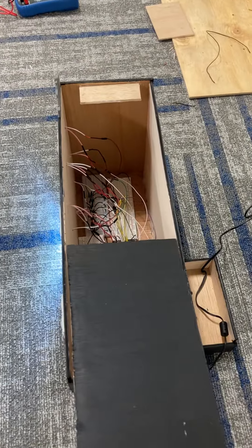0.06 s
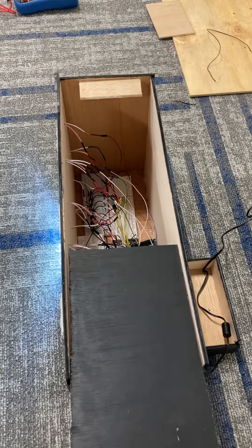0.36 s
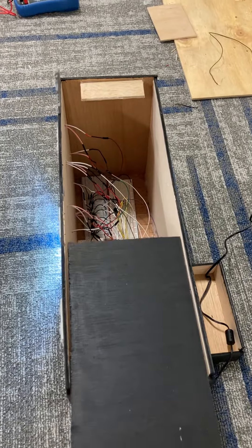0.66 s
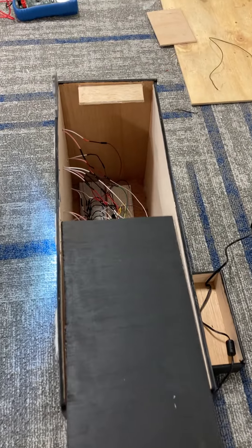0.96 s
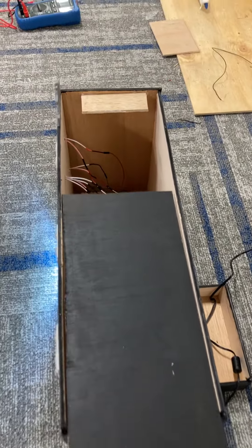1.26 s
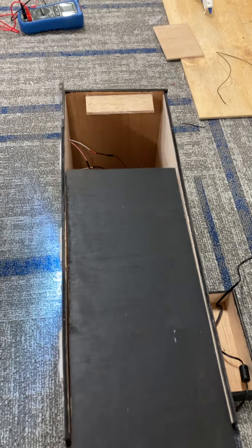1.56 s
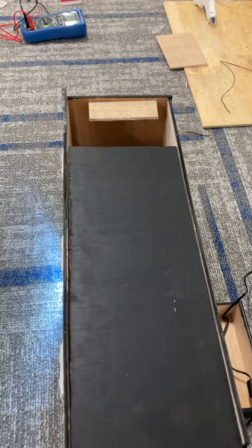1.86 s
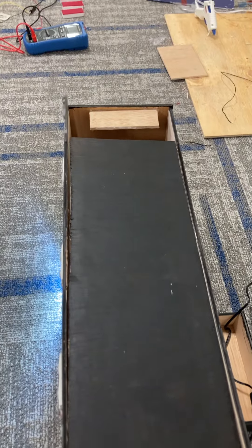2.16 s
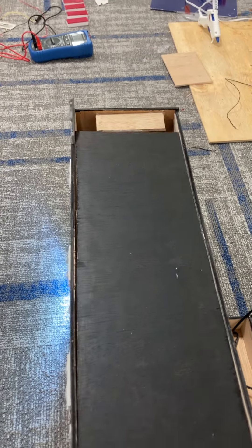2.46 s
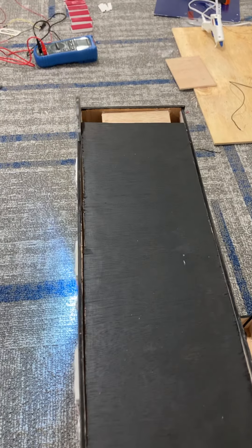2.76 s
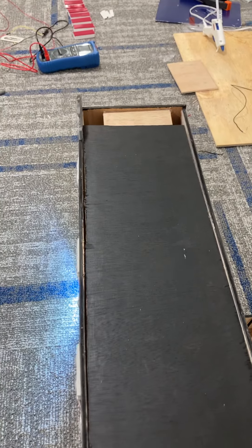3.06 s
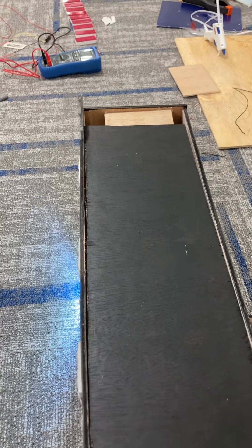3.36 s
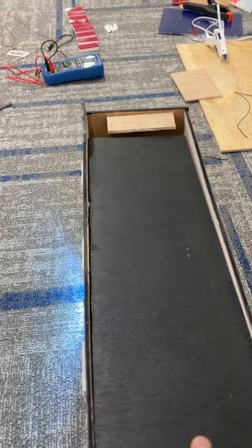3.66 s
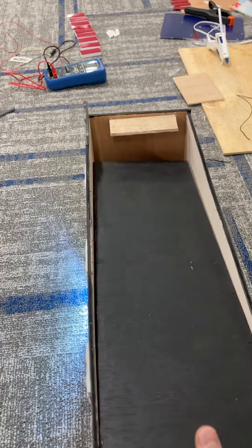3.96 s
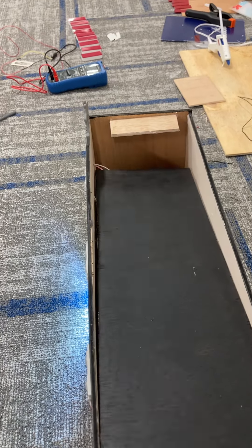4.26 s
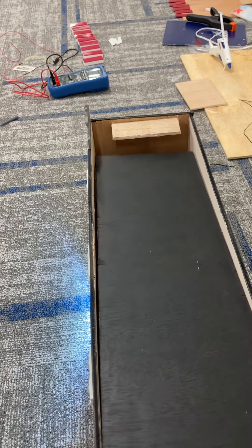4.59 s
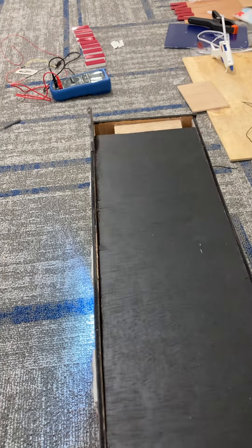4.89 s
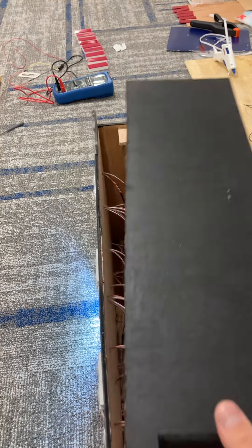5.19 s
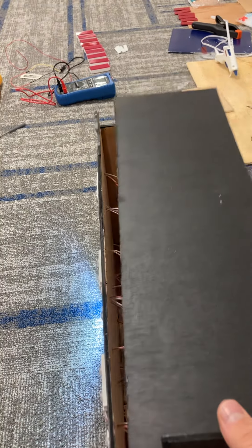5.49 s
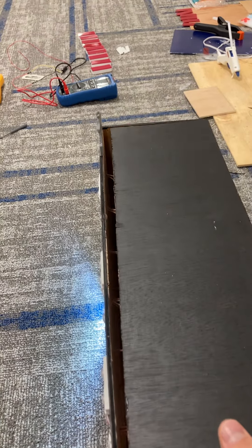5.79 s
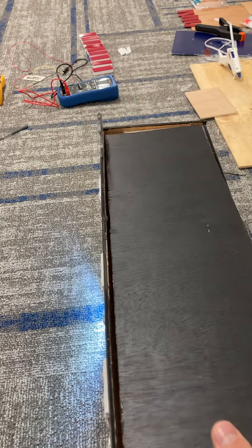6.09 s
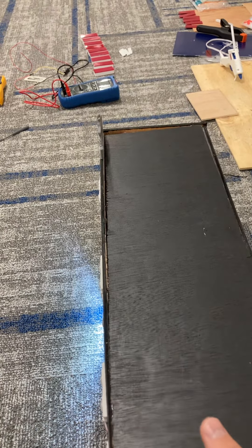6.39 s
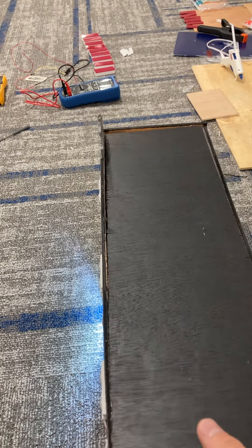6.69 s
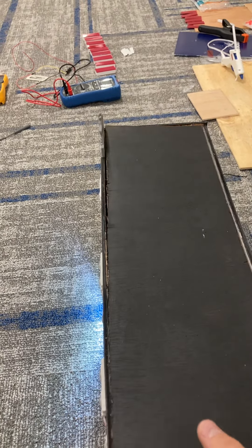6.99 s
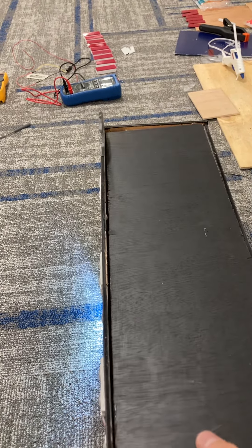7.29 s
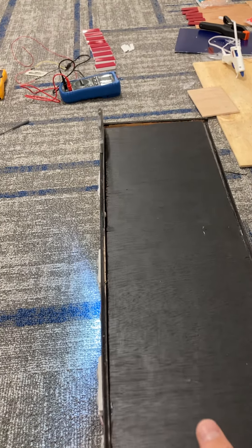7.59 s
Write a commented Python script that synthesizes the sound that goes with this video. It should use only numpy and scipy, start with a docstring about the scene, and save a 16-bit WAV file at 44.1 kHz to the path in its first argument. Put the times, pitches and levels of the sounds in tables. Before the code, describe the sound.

A wooden lid scrapes along the rim of a box, then knocks, shuffles and taps into place over a low ventilation hum.

```python
"""Carpeted room: a painted plywood lid is slid along the rim of a wooden box, lifted, set down and
nudged into place. Stick-slip grains and knocks ring the same panel and board modes; the rails ring
and squeak, the paint hisses and snaps, edges tick. Ventilation hums underneath.
A hand-held phone with two microphones listens from above."""
import sys
import numpy as np
from scipy import signal
from scipy.fft import rfft, irfft
from scipy.io import wavfile
from scipy.ndimage import uniform_filter1d

SR = 44100
rng = np.random.default_rng(int(sys.argv[2]) if len(sys.argv) > 2 else 0)


def waveform_to_disk(signal):
    """Save audio, clipped to [-1, 1], as 16-bit WAV at the path in sys.argv[1]."""
    frames = np.transpose(np.atleast_2d(signal))
    scaled = np.clip(frames, -1, 1) * 32767
    samples = np.round(scaled).astype(np.int16)
    wavfile.write(sys.argv[1], SR, samples)


N = 345744
TIME_S = np.arange(N) / SR
RING_S = TIME_S[:SR // 4]

# long push along the rim: (time [s], friction [dB], brightness [dB])
SLIDE = [(.3, -47, -6), (.52, -51.5, -3.5), (.66, -39.5, -1.5), (.8, -37, 0.5), (1.06, -38.5, 1.5),
         (1.22, -38.5, 6.5), (1.35, -37, -2), (1.52, -38.5, -0.5), (1.68, -39, -3), (1.88, -40.5, -6),
         (2.06, -48.5, 4.5), (2.24, -47, -0.5), (2.42, -58, -1.5), (2.57, -51, 2), (2.72, -74, -17)]
# short shoves, bright on a bare edge, dull with the lid flat:
# (full-force time [s], swell [s], hold [s], stop t60 [s], friction [dB], brightness [dB])
SHOVES = [(.01, .015, 0.019, 0.22, -52.5, -2.5), (.165, 0.035, 0.017, .28, -57.5, 1),
          (.208, .02, 0.016, 0.37, -53, 4.5), (.361, 0.017, .047, 0.22, -50, 8.5),
          (3.0, 0.082, .04, 0.27, -45.5, 1), (3.1, .033, 0.11, 0.41, -57, -11),
          (3.175, 0.04, 0.02, 0.082, -56.5, 11.5), (3.538, 0.0062, 0.06, 0.22, -48.5, -1.5),
          (3.705, 0.18, 0.023, .17, -45.5, 7.5), (3.815, .028, 0.089, 0.16, -56, -4),
          (3.95, 0.016, 0.025, 0.23, -48.5, -5.5), (4.025, 0.03, 0.044, 0.26, -43, 8),
          (4.111, 0.023, 0.078, 0.21, -50, 2), (4.45, 0.27, .13, 0.16, -53.5, -2),
          (4.48, .13, 0.19, 0.16, -63.5, 24), (4.57, 0.022, .016, 0.32, -58, 29.5),
          (4.7, 0.022, .04, 0.19, -61.5, 18), (4.752, 0.049, 0.068, 0.3, -47.5, 8),
          (4.942, 0.16, 0.047, 0.2, -52, 4.5), (6.13, 0.12, 0.08, 0.17, -55.5, -1),
          (6.285, 0.037, .012, 0.13, -50, 3), (6.325, .03, 0.014, .2, -58, 6),
          (6.402, 0.043, .045, .15, -51.5, 12), (6.475, .03, 0.014, .25, -51.5, 3),
          (6.54, .03, 0.0092, .25, -63.5, 15), (6.712, .03, 0.0073, .16, -64.5, 9),
          (6.78, .015, 0.059, .15, -65.5, 11), (6.87, .04, .02, 0.18, -61.5, 10),
          (7.135, 0.11, 0.026, 0.38, -53.5, 5.5), (7.23, 0.067, 0.087, 0.3, -58, 6.5),
          (7.333, 0.016, 0.02, .15, -48.5, 4.5), (7.378, .02, .012, 0.067, -53, 9),
          (7.505, 0.21, 0.062, 0.12, -57, 4.5), (7.549, .012, 0.0048, 0.055, -57, 19),
          (7.625, 0.061, 0.022, 0.25, -52, 13), (7.788, 0.011, 0.024, 0.086, -65.5, 15)]
# lid striking or catching on the box:
# (time [s], thump [dB], clack [dB], tick [dB], panel focus [Hz], board focus [Hz], chatter decay [s])
KNOCKS = [(0.008, -33, -34.5, -66, 235, 1280, 0.0011), (0.159, -61, -47, -59.5, 300, 1780, 0.011),
          (0.2721, -23, -23.5, -44, 337, 734, 0.0032), (0.285, -23.5, -33, -51, 322, 760, 0.0055),
          (0.3176, -16, -26, -61, 310, 736, 0.0068), (0.361, -31.5, -53, -73, 345, 750, .004),
          (0.707, -25, -47, -59, 300, 764, 0.0056), (0.742, -23, -40, -64, 305, 760, .005),
          (0.828, -25, -33, -73, 263, 820, 0.013), (1.167, -18.5, -29, -53, 297, 1040, 0.0063),
          (1.698, -28, -35.5, -75, 287, 790, 0.019), (1.97, -25, -40, -59, 318, 940, 0.0053),
          (2.497, -61, -45.5, -66, 242, 734, 0.023), (2.583, -28, -42, -64.5, 272, 700, 0.02),
          (3.006, -18.5, -32, -75, 260, 1680, 0.0036), (3.037, -21, -38, -52.5, 260, 890, 0.0033),
          (3.065, -25.5, -48, -60, 216, 650, 0.0048), (3.08, -32, -32.5, -59, 231, 1650, 0.0034),
          (3.103, -28.5, -34.5, -63, 216, 1650, 0.0093), (3.119, -27, -57, -64, 198, 1680, .005),
          (3.533, -33, -39, -77, 194, 720, 0.01), (3.603, -37.5, -46, -69, 198, 736, 0.011),
          (3.735, -33.5, -43, -71, 240, 740, 0.0068), (3.789, -22.5, -22, -41.5, 245, 1730, 0.0029),
          (3.795, -26.5, -22.5, -47, 305, 574, 0.0027), (3.818, -33, -44, -50, 280, 594, 0.015),
          (3.946, -31.5, -43, -62, 270, 700, 0.0063), (4.019, -51, -43, -54, 282, 1650, 0.0025),
          (4.044, -29, -40, -45, 290, 1450, 0.012), (4.061, -23.5, -29.5, -47, 290, 620, 0.0038),
          (4.074, -18, -22.5, -37, 373, 512, 0.0062), (4.079, -37, -25.5, -37, 350, 1650, 0.0035),
          (4.089, -31, -38, -69, 362, 600, 0.0061), (4.162, -35, -38.5, -55.5, 300, 1300, 0.0065),
          (4.21, -26, -66, -86, 268, 730, 0.0045), (4.431, -32, -58, -73, 268, 760, 0.005),
          (4.741, -45, -49, -53, 245, 1650, 0.0071), (4.797, -36, -40.5, -80, 224, 715, 0.0085),
          (4.806, -40, -48, -52, 250, 1650, 0.0025), (4.935, -35, -52, -79, 266, 730, 0.0056),
          (4.997, -57, -42, -55, 270, 2040, 0.0062), (5.797, -35, -54, -75, 256, 730, .005),
          (5.868, -34, -40.5, -68, 212, 496, 0.0034), (5.88, -36, -48, -78, 224, 730, .005),
          (6.066, -37, -34, -69, 213, 1815, 0.0047), (6.076, -26.5, -41, -69, 220, 517, 0.0061),
          (6.093, -27.5, -35.5, -102, 255, 516, 0.0073), (6.109, -31, -63, -89, 220, 609.5, 0.0077),
          (6.389, -30.5, -55, -58, 297, 1060, 0.0048), (7.125, -34.5, -45.5, -51.5, 234, 1790, .006),
          (7.145, -31.5, -34, -62, 290, 1440, 0.0082), (7.156, -32, -41, -55, 230, 680, 0.0082),
          (7.191, -27.5, -39, -83, 213, 694, 0.0059), (7.336, -31.5, -54, -50.5, 216, 706, 0.0082),
          (7.393, -30.5, -50.5, -97, 195, 690, 0.0052)]
# slight shift in the wood's tone: (time [s], blend from mode levels A toward B [fraction])
TONE_BLEND = [(.3, 0.16), (.6, 0), (1.9, 0), (2.6, 0.13), (3.0, 0.12)]
# panel bending modes: (frequency [Hz], level A [dB], level B [dB], base t60 [s])
PANEL_MODES = [(122, 8.5, 15.5, 0.023), (145, -23, 7, 0.093), (164.4, -7.5, 20, 0.32), (195, -9, 6, 0.18),
               (221.9, -1, 0.5, 0.18), (245, 4, -20, 0.092), (267.7, 1.5, -10, 0.043),
               (289.2, 1, -8, 0.098), (306.5, -9, 4, 0.068), (343.9, 0, 5.5, 0.18), (373.3, -6, 0.5, 0.13)]
# higher board modes: (frequency [Hz], level A [dB], level B [dB], base t60 [s])
BOARD_MODES = [(428, -8, 22.5, 0.17), (500, -3, 22, 0.095), (539, -9.5, 12, 0.15), (604, 3, 9.5, 0.023),
               (647, 0, 16.5, 0.076), (738, 7, -27, 0.046), (812, 10.5, -27, 0.038),
               (962, -11.5, -33, 0.077), (1056, 9, -17.5, 0.027), (1223, -0.5, -17.5, 0.032),
               (1437, -11, -2, 0.033), (1650, 0.5, 15, 0.022), (1823, -5.5, 2, 0.02), (2137, -4, -4, 0.016),
               (2500, -4, -36, 0.019), (2887, -6.5, -12, 0.018), (3330, -7.5, -34, 0.017),
               (4010, -10.5, -59, 0.0046)]
# narrow rail modes: (frequency [Hz], level A [dB], level B [dB], t60 [s])
RAIL_MODES = [(927, 3.5, -6, 0.063), (1440, -6.5, -2, 0.052), (1657, 11, 1, 0.091), (2062, -7.5, 2, 0.04),
              (2314, -2.5, -6, 0.058), (2588, -1.5, -1, .08), (2829, -5, 5, 0.045), (2902, 1, 3, 0.027),
              (3420, -4.5, -7, 0.064), (3826, -4.5, -14, 0.03), (4010, -7.5, -8, 0.048)]
# whistling resonances of the painted edge: (frequency [Hz], width [Hz], level [dB])
SHEEN_MODES = [(7700, 190, -17), (8350, 130, 5), (9380, 160, 4), (9810, 170, 7)]
# box cavity after a square blow: (time [s], frequency [Hz], level [dB], t60 [s])
CAVITY_RINGS = [(.335, 336, -24, 0.44), (4.083, 352.8, -20, 0.34), (6.394, 317.7, -33, .4)]
# groans and squeaks on a rail: (time [s], length [s], frequency [Hz], level [dB])
SQUEAKS = [(0.598, 0.2, 273.2, -22.5), (1.275, 0.048, 752, -34), (1.72, 0.24, 844, -41),
           (1.93, 0.17, 351.2, -33), (3.643, 0.11, 1677, -50), (3.952, 0.071, 277, -33),
           (6.376, 0.11, 1027, -51), (6.385, 0.1, 650, -53)]
# tacky paint snapping free: (time [s], level [dB], t60 [s])
SNAPS = [(0.133, -91, 0.02), (0.274, -49, 0.034), (3.787, -35, 0.0044), (4.022, -46, 0.046),
         (4.078, -31.5, 0.012), (4.235, -64, .014), (4.822, -50.5, 0.022), (6.083, -63, .012),
         (6.285, -43, 0.022), (6.445, -37.5, 0.0033), (6.81, -53, 0.0049), (7.083, -59, 0.033),
         (7.139, -50, 0.019), (7.356, -39.5, 0.0087), (7.704, -58, 0.049)]
# wood contact noise: (frequency [Hz], level [dB])
WOOD_SPECTRUM = [(300, -23), (480, -2), (750, 5), (1050, -2.5), (1400, -7.5), (2000, -7), (2600, -19),
                 (3000, -25), (4200, -8.5), (6000, -10.5), (15000, -83)]
# rubbed paint: (frequency [Hz], level [dB])
PAINT_SPECTRUM = [(2500, 4), (4500, 0), (6300, 5), (8500, 9), (11000, 0), (14500, -0.5), (17000, -8.5)]
# edge tick: (frequency [Hz], level [dB])
TICK_SPECTRUM = [(1500, -26), (4000, -6), (6300, 0.5), (8500, 13.5), (11000, 5.5), (16000, -48)]
# paint snap: (frequency [Hz], level [dB])
SNAP_SPECTRUM = [(1000, -40), (3000, 7), (4500, 5), (6500, 10), (8500, 21), (11000, 17), (16000, 3)]
# ventilation rush: (frequency [Hz], level [dB])
AIR_SPECTRUM = [(20, -21), (45, -10), (65, 2), (90, -3.5), (125, -6.5), (170, -10), (300, -9), (370, -15.5),
                (440, -19.5), (750, -23), (1400, -29), (3000, -42.5), (6500, -50), (15000, -69)]
# fan tones: (frequency [Hz], level [dB])
FAN_TONES = [(64.6, -60), (123.8, -57), (360.7, -59.5)]
# microphone pair: (frequency [Hz], left phase lead [rad], left minus right [dB])
MIC_PAIR = [(60, 0, .2), (200, -.3, .8), (320, -.8, 3), (420, -1.15, -2.5), (600, -1.3, -5),
            (1000, -2.1, -3), (1350, -2, -3), (1680, -2.2, -1), (1950, -3.8, -1), (4100, -4.2, 0),
            (5600, -3.1, 0), (8500, 0, 0), (11700, 3.1, 0), (15000, 6.3, 0)]

SLIDE_RUMBLE_DB, SLIDE_HISS_DB, SHOVE_RUMBLE_DB, SHOVE_HISS_DB = 6, -13, 10, -11  # re rasp
RUMBLE_PER_BRIGHT, HISS_PER_BRIGHT = -0.59, 0.53  # dB per dB of brightness
SHOVE_SWELL_DB, JUDDER_HZ, JUDDER_DB = 22.5, 12, 3.5
REBOUND_S, REBOUND_SCATTER_S, REBOUND_DB, REBOUND_SOFTER_DB = 0.019, 0.00604, -11.5, 9.5
BOARD_DETUNE, BOARD_FOCUS_DB, BOARD_FOCUS_OCT = 0.011, 10.5, 0.13
CHATTER_PER_S, CHATTER_DB = 800, -4
RAILS_DB, RAILS_SAG_PER_S = -6.5, 0.06
ECHO_DELAY_S, ECHO_DB = (0.0008, 0.01), -4


def rubbing():
    """Rails drag on the lid: coarse slips rumble, finer ones rasp, the finest hiss."""
    rumble_gain, rasp_gain, hiss_gain = friction_gains()
    grip = walk(rate_hz=45)
    rumble, rasp, hiss = panel_rumble(), board_rasp(), paint_hiss()
    rasp, hiss = (unit(x + undb(ECHO_DB) * lid_echoes(x, rate_hz=7)) for x in (rasp, hiss))
    # the lid sticks and lurches
    judder_db = JUDDER_DB * np.sin(2 * np.pi * JUDDER_HZ * TIME_S + 3.18 * walk(rate_hz=8))
    return (rumble * rumble_gain * undb(judder_db + 1.5 * grip)
            + rasp * rasp_gain * undb(-3 + 0.76 * grip)
            + hiss * hiss_gain * undb(-0.8 + 1.3 * grip))


def friction_gains():
    """Rumble, rasp and hiss follow the push and shoves; an edge trades rumble for hiss."""
    times_s, push_db, bright_db = np.transpose(SLIDE)
    push = undb(np.interp(TIME_S, times_s, push_db)) * (TIME_S > times_s[0]) * (TIME_S < times_s[-1])
    bright_db = np.interp(TIME_S, times_s, bright_db)
    rumble = push * undb(SLIDE_RUMBLE_DB + RUMBLE_PER_BRIGHT * bright_db)
    hiss = push * undb(SLIDE_HISS_DB + HISS_PER_BRIGHT * bright_db)
    power = np.array([rumble, push, hiss]) ** 2
    for at_s, swell_s, hold_s, t60_s, db, bright_db in SHOVES:
        swell_db = -SHOVE_SWELL_DB * (at_s - TIME_S).clip(0, 1) / swell_s
        stop_db = -60 * (TIME_S - at_s - hold_s).clip(0, 1) / t60_s
        rumble_db = db + SHOVE_RUMBLE_DB + RUMBLE_PER_BRIGHT * bright_db
        hiss_db = db + SHOVE_HISS_DB + HISS_PER_BRIGHT * bright_db
        power += np.outer(undb([rumble_db, db, hiss_db]), undb(swell_db + stop_db)) ** 2
    return np.sqrt(power)


def panel_rumble():
    """Coarse slips shake the panel as the contact travels between knock spots."""
    times_s, _, _, _, panel_hz, _, _ = np.transpose(KNOCKS)
    rumble = dragged_modes(PANEL_MODES, slips(per_s=900, spread_db=1.16), wander_db=3.5, rate_hz=7,
                           focus_hz=np.interp(TIME_S, times_s, panel_hz), db_per_oct2=25.5)
    swing = np.sqrt(uniform_filter1d(rumble ** 2, size=900).clip(1e-9))
    return unit(rumble / swing ** 0.66)  # friction caps the swing


def board_rasp():
    """Fine slips and catching splinters ring the boards; pitch drifts with their free length."""
    catches = slips(per_s=3000, spread_db=0.5) + undb(9.5) * slips(per_s=70, spread_db=1)
    boards = dragged_modes(BOARD_MODES, catches, wander_db=1, rate_hz=11, focus_hz=910, db_per_oct2=-1)
    boards = drift(boards, share=0.018, rate_hz=7)
    grit = unit(colour(slips(per_s=1500, spread_db=4), WOOD_SPECTRUM))
    return unit(boards + undb(-3.5) * grit)


def paint_hiss():
    """The finest slips hiss on the paint and ring its edge."""
    fine = slips(per_s=4500, spread_db=2)
    sheen = sum(undb(db) * unit(resonance(fine, hz, width_hz)) for hz, width_hz, db in SHEEN_MODES)
    sheen = drift(sheen, share=0.0046, rate_hz=4)
    return unit(colour(fine, PAINT_SPECTRUM)) + undb(-7.5) * unit(sheen)


def slips(per_s, spread_db):
    """Friction releases: random impulses of unequal size."""
    impulses = (rng.random(N) < per_s / SR) * rng.choice([-1, 1], N)
    return impulses * undb(spread_db * rng.exponential(size=N).clip(0, 4))


def dragged_modes(modes, drive, wander_db, rate_hz, focus_hz, db_per_oct2):
    """Slip-driven modes swell and fade as the contact crosses nodes; total power is steady."""
    out, power, blend = 0, 0, blend_at(TIME_S)
    for hz, a_db, b_db, t60_s in modes:
        focus_db = -db_per_oct2 * np.log2(hz / focus_hz) ** 2
        gain = undb(a_db + blend * (b_db - a_db) + wander_db * walk(rate_hz) + focus_db)
        ring = resonance(drive, hz, width_hz=np.log(1000) / (np.pi * t60_s))
        ring = resonance(ring, hz, width_hz=hz / 1.93)  # little radiation far from the mode
        out += gain * unit(ring) * rng.choice([-1, 1])
        power += gain ** 2
    return out / np.sqrt(power)


def knocking():
    """The edge scuffs the rim, catches, and rebounds once, more softly."""
    out, lead_s = np.zeros(N), RING_S[:SR // 80]
    for at_s, thump_db, clack_db, tick_db, *contact in KNOCKS:
        blend = blend_at(at_s)
        hard_db = 6.5 + 0.77 * (tick_db - clack_db) + 0.049 * clack_db
        add(out, at_s, knock(blend, thump_db, clack_db, tick_db, hard_db, *contact))
        rebound = knock(blend, thump_db, clack_db, tick_db - REBOUND_SOFTER_DB,
                        hard_db - REBOUND_SOFTER_DB, *contact)
        rebound_s = at_s + REBOUND_S + REBOUND_SCATTER_S * rng.uniform(-1.017, 1)
        add(out, rebound_s, undb(REBOUND_DB) * rebound)
        scuff = crest(burst(np.exp(lead_s / 0.0021), PAINT_SPECTRUM))
        add(out, at_s - lead_s[-1], undb(tick_db - 6) * scuff)
    return out


def knock(blend, thump_db, clack_db, tick_db, hard_db, panel_hz, board_hz, chatter_s):
    """One blow: the edge ticks, the boards clack, the panel swells last."""
    thump = panel_thump(blend, panel_hz)
    clack = board_clack(blend, hard_db, board_hz, chatter_s)
    contact = fade(t60_s=0.0031, rise_s=0.00022) + undb(-5.5) * fade(t60_s=0.035, rise_s=0.0035)
    tick = crest(burst(contact, TICK_SPECTRUM))
    return undb(thump_db + 1) * thump + undb(clack_db - 0.73) * clack + undb(tick_db + 0.5) * tick


def panel_thump(blend, focus_hz):
    """Bending waves align 8 ms after contact, then drift apart."""
    hz, a_db, b_db, t60_s = np.transpose(PANEL_MODES)
    focus_db = -np.minimum(40 * np.log2(hz / focus_hz) ** 2, 9)
    gains = undb(a_db + blend * (b_db - a_db) + focus_db)
    waves = sum(gain * fade(decay_s, rise_s=0.00051) * np.cos(2 * np.pi * f * (RING_S - 0.008))
                for f, gain, decay_s in zip(hz, gains, 1.5 * t60_s))
    onset = 1 - np.exp(-(RING_S / 0.0008) ** 2)
    return crest(waves * onset)


def board_clack(blend, hard_db, focus_hz, chatter_s):
    """Each spot detunes the boards and favours one pitch; harder contact is brighter."""
    hz, a_db, b_db, t60_s = np.transpose(BOARD_MODES)
    focus_db = BOARD_FOCUS_DB * np.exp(-(np.log2(hz / focus_hz) / BOARD_FOCUS_OCT) ** 2)
    tilt_db = 0.36 * (hard_db + 16) * np.log2(hz / 1000)
    gains = undb(a_db + blend * (b_db - a_db) + focus_db + tilt_db)
    hz = hz * (1 + BOARD_DETUNE * rng.standard_normal(len(hz)))
    boards = crest(sum(gain * mode(f, decay_s, rise_s=2.6 / f)
                       for f, gain, decay_s in zip(hz, gains, 0.5 * t60_s)))
    crack = crest(burst(fade(t60_s=0.034, rise_s=0.00025), WOOD_SPECTRUM))
    crack_db = -5.5 + 0.47 * (hard_db - 5)
    return crest(convolve(boards + undb(crack_db) * crack, chatter(chatter_s)))


def chatter(decay_s):
    """Rough edge: one touch, then a dying run of small contacts."""
    touches = (rng.random(len(RING_S)) < CHATTER_PER_S / SR) * rng.standard_normal(len(RING_S))
    return (RING_S == 0) + undb(CHATTER_DB) * touches * np.exp(-RING_S / decay_s)


def box_cavity():
    """One low box mode rings on after a square blow."""
    out = np.zeros(N)
    for at_s, hz, db, t60_s in CAVITY_RINGS:
        add(out, at_s, undb(db) * mode(hz, t60_s, rise_s=0.0036))
    return out


def squeaking():
    """Slips lock briefly onto one wood mode."""
    out = np.zeros(N)
    for at_s, length_s, hz, db in SQUEAKS:
        count = int(length_s * SR)
        pitch_hz = hz * (1 + 0.027 * walk(rate_hz=hz / 8)[:count])
        envelope = (1 + 0.57 * walk(rate_hz=hz / 7)[:count]) * signal.windows.tukey(count, 0.7)
        add(out, at_s, undb(db) * envelope * np.sin(2 * np.pi * np.cumsum(pitch_hz) / SR))
    return out


def singing_rails():
    """The long push rings the rails; pitch sinks as more of the lid bears on them."""
    times_s, push_db, _ = np.transpose(SLIDE)
    start_s, end_s = times_s[0], times_s[-1]
    rails = dragged_modes(RAIL_MODES, slips(per_s=2500, spread_db=1), wander_db=6, rate_hz=8.95,
                          focus_hz=2500, db_per_oct2=-1.5)
    sag = RAILS_SAG_PER_S * (TIME_S.clip(start_s, end_s) - times_s.mean())
    rails = varispeed(rails, 1 - sag + 0.01 * walk(rate_hz=6))
    pushing = (TIME_S > start_s) & (TIME_S < end_s)
    return rails * undb(RAILS_DB + np.interp(TIME_S, times_s, push_db)) * pushing


def paint_snaps():
    """Tacky paint lets go in short, bright clicks."""
    out = np.zeros(N)
    for at_s, db, t60_s in SNAPS:
        add(out, at_s, undb(db) * crest(burst(fade(t60_s, rise_s=0.0001), SNAP_SPECTRUM)))
    return out


def lid_echoes(x, rate_hz, count=10):
    """Returns from the lid edges, each swelling and fading as the contact moves."""
    lags = (SR * rng.uniform(*ECHO_DELAY_S, count)).astype(int)
    gains = np.array([walk(rate_hz) for _ in lags])
    returns = sum(gain * np.pad(x, (lag, 0))[:N] for gain, lag in zip(gains, lags))
    return returns / np.sqrt(np.sum(gains ** 2, axis=0))


def room(x, t60_s, wet_db):
    """Short, dull reflections of a carpeted room."""
    tail = burst(fade(t60_s, rise_s=0.00097), [(200, -4.5), (2000, 3), (12000, -10.5)])
    return undb(wet_db) * convolve(x, tail / np.linalg.norm(tail))


def ventilation():
    """Low rush of air with wavering fan tones."""
    rush = unit(colour(rng.standard_normal(N), AIR_SPECTRUM)) * undb(-47.5 + 0.7 * walk(rate_hz=12))
    hum = sum(undb(db) * np.sqrt(2) * np.sin(2 * np.pi * hz * TIME_S + 1.19 * walk(rate_hz=5))
              for hz, db in FAN_TONES)
    return rush + hum


def faint_hiss(hz=4600, width_hz=1300, fade_db_per_s=6):
    """Thin, high hiss fading over the long slide."""
    band = resonance(resonance(rng.standard_normal(N), hz, width_hz), hz, width_hz)
    gate = uniform_filter1d(1.0 * ((TIME_S > 0.12) & (TIME_S < 3.2)), size=3000)
    return undb(-56.5 - fade_db_per_s * TIME_S) * unit(band) * gate


def blend_at(time_s):
    """Blend from mode levels A toward B."""
    return np.interp(time_s, *np.transpose(TONE_BLEND)).clip(0, 1)


def undb(db):
    return np.exp(np.asarray(db) * (np.log(10) / 20))


def unit(x):
    """Scale to rms 1."""
    return x / np.sqrt(np.mean(x ** 2))


def crest(x):
    """Scale the loudest 4 ms to rms 1."""
    return x / np.sqrt(uniform_filter1d(x ** 2, size=176).max())


def along(hz, points, column=1):
    """Interpolate a table column over log frequency."""
    points = np.array(points)
    return np.interp(np.log(hz + 1), np.log(points[:, 0]), points[:, column])


def colour(x, spectrum, size=4096):
    """Minimum-phase filter from (frequency [Hz], level [dB]) points."""
    cepstrum = irfft(np.log(undb(along(np.fft.rfftfreq(size, 1 / SR), spectrum))))
    cepstrum[1:size // 2] *= 2
    cepstrum[size // 2 + 1:] = 0
    return convolve(x, irfft(np.exp(rfft(cepstrum))))


def burst(envelope, spectrum):
    return colour(rng.standard_normal(len(envelope)) * envelope, spectrum)


def convolve(x, response):
    return signal.fftconvolve(x, response)[:len(x)]


def resonance(x, hz, width_hz):
    return signal.lfilter(*signal.iirpeak(hz, hz / width_hz, fs=SR), x)


def walk(rate_hz):
    """Random wander, spread near 1."""
    knots = rng.standard_normal(2000)
    return 1.3 * np.interp(TIME_S * rate_hz, np.arange(len(knots)), knots)


def varispeed(x, speed):
    return np.interp(np.cumsum(speed), np.arange(N), x, period=N)


def drift(x, share, rate_hz):
    """All pitches wander by a small share."""
    return varispeed(x, 1 + share * walk(rate_hz))


def fade(t60_s, rise_s):
    return (1 - np.exp(-RING_S / rise_s)) * np.exp(-np.log(1000) * RING_S / t60_s)


def mode(hz, t60_s, rise_s):
    """Decaying sine, random phase."""
    return fade(t60_s, rise_s) * np.sin(2 * np.pi * (hz * RING_S + rng.random()))


def add(out, at_s, sound):
    start = max(int(at_s * SR), 0)
    out[start:start + len(sound)] += sound[:N - start]


def scene():
    """Close lid, room tail and air in the mid; reflections above the bass in the side."""
    snaps = paint_snaps()
    wood = rubbing() + singing_rails() + knocking() + box_cavity() + squeaking() + snaps
    air = ventilation() + faint_hiss()
    tail = colour(room(wood, t60_s=0.45, wet_db=-13.5), [(280, 1), (600, -0.5), (9000, -9)])
    reflected = colour(room(wood + air, t60_s=0.059, wet_db=-10.5),
                       [(100, -15.5), (300, -10), (1000, -4.5), (4000, -6), (9000, -29.5)])
    # the wide lid radiates along many paths
    spread = colour(room(lid_echoes(wood, rate_hz=5), t60_s=0.021, wet_db=-9),
                    [(300, -20.5), (700, -1.5), (1400, -2), (3000, -5), (5500, -10.5), (9000, -23.5)])
    glance = room(snaps, t60_s=0.006, wet_db=-4)  # off the lid
    mid = wood + tail + air
    side = reflected + spread + glance
    return np.array([mid + side, mid - side])


def record(dry, top_hz=15900):
    """Two microphones, each with its own phase and level per band; then a low-pass."""
    hz = np.fft.rfftfreq(N, 1 / SR)
    lead_rad, balance_db = along(hz, MIC_PAIR, column=1), along(hz, MIC_PAIR, column=2)
    left_response = undb(balance_db / 2) * np.exp(0.5j * lead_rad)
    pair = irfft(rfft(dry) * np.array([left_response, 1 / left_response]), N)
    return signal.sosfilt(signal.ellip(8, 0.2, 70, top_hz, fs=SR, output="sos"), pair)


dry = scene()
out = record(dry)
waveform_to_disk(out)
```